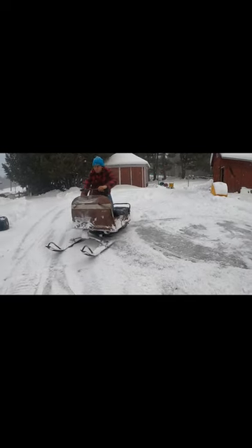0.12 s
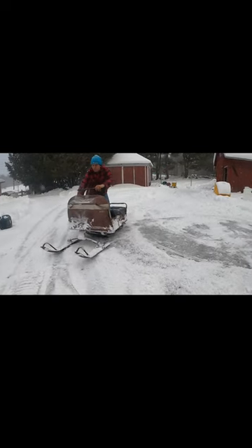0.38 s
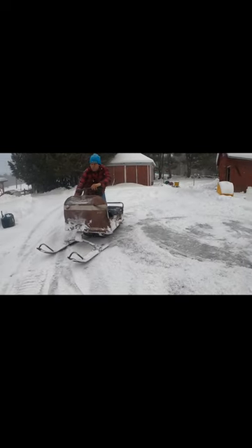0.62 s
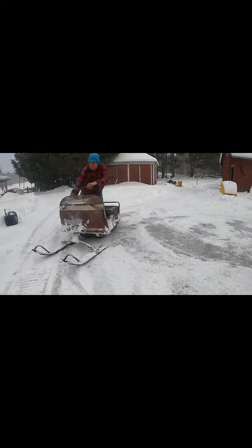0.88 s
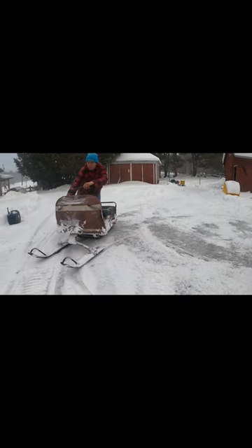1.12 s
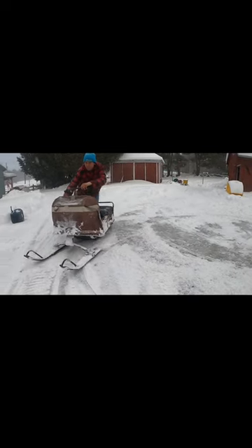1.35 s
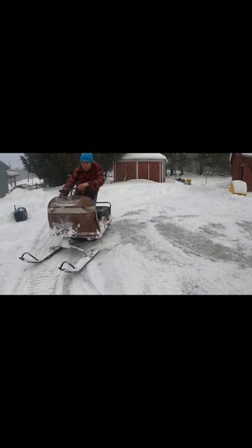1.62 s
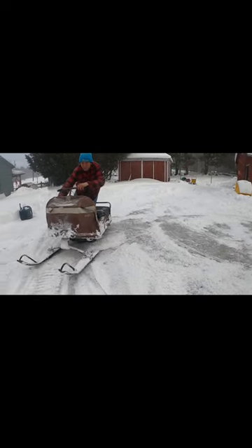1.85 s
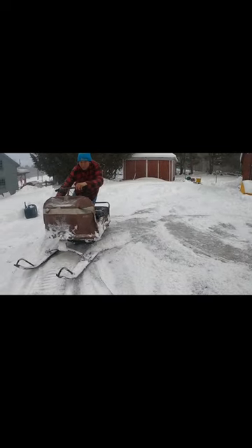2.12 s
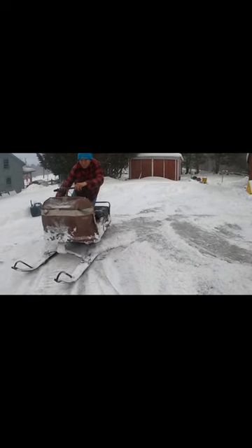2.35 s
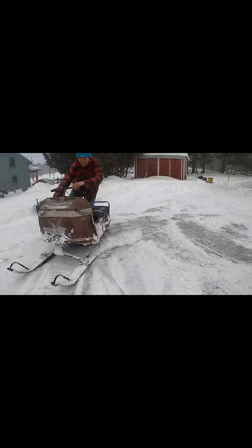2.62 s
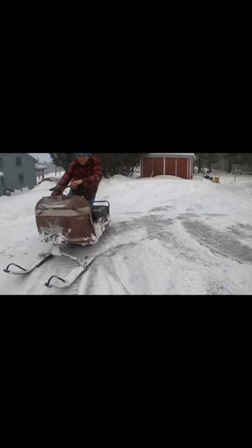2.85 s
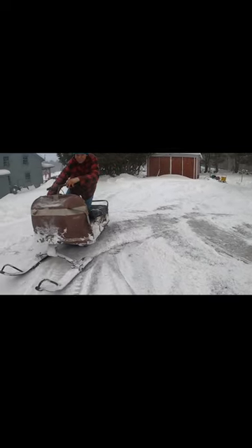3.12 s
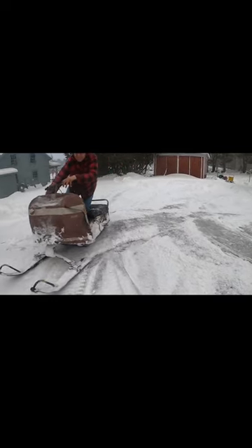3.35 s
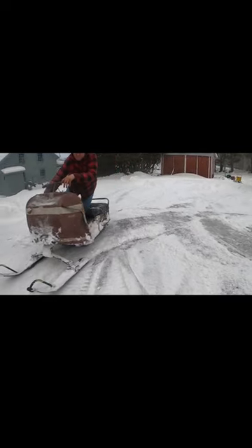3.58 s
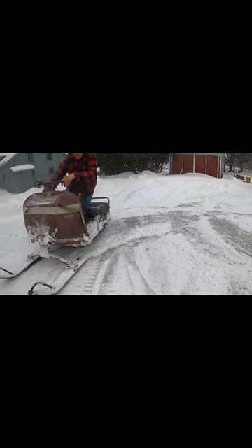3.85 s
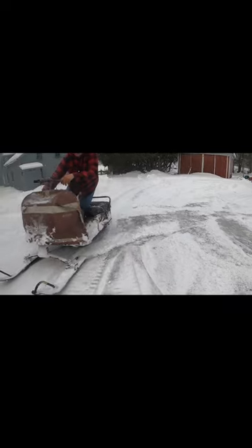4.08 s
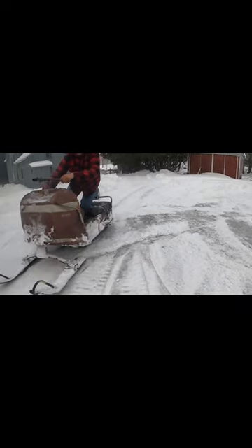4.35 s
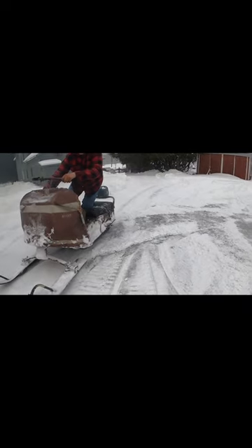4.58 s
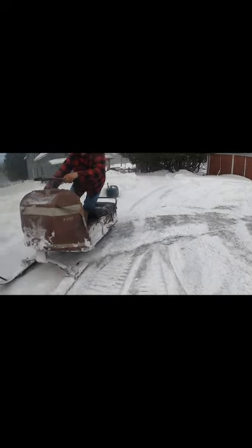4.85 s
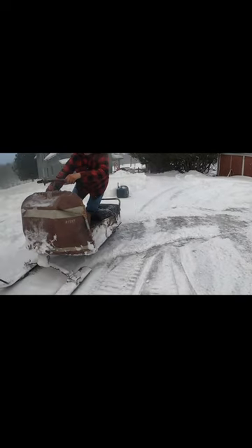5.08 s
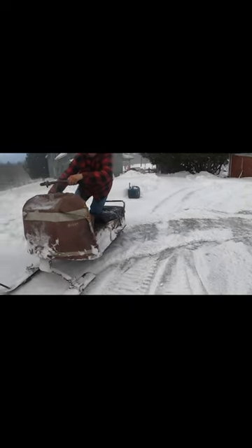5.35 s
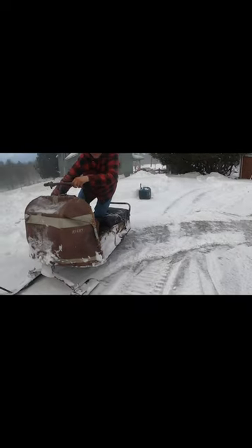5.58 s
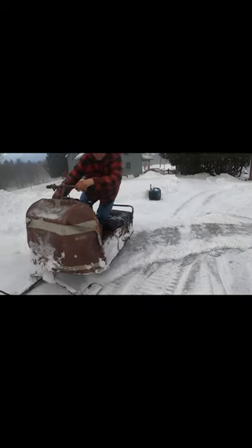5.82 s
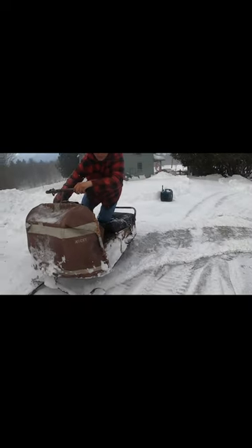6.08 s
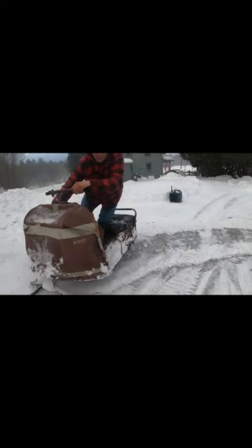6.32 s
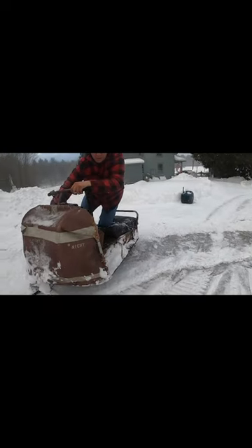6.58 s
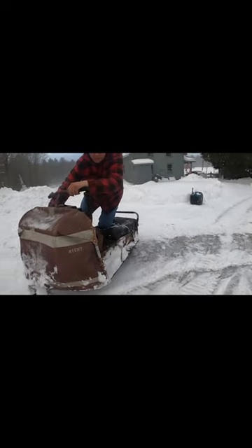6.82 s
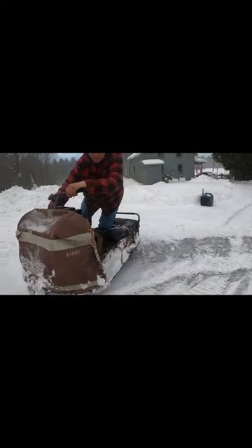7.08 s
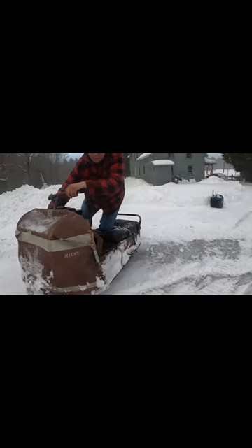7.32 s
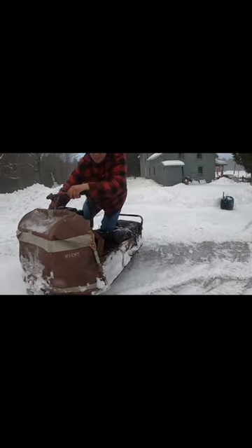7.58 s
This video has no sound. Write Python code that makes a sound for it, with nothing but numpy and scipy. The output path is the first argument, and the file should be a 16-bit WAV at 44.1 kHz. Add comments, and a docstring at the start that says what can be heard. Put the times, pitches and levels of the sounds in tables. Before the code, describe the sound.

Slow-motion single-cylinder engine, close stereo microphones outdoors, dry. First come loose, hesitant low thumps and ticking parts over a rumbling drone, then one hard bark just before two seconds. From there each firing is a deep thud with a rasping gas burst and a short hollow muffler note, quickening slightly into a regular pulse with hood resonance and rattling, continuing to the end.

```python
"""A single-cylinder snowmobile engine idles unevenly on a snowy yard, heard close by as if slowed four-fold.
Each firing is a deep thump, a short swing of pressure that leaves the exhaust pipe ringing.
Bursts of shaped noise make the rasping bark of gas on top, and a fading tone is the muffler's note.
Noise and short damped tones make the rumble, drone, clatter and taps between; panels of the hood ring at times.
The sound falls off steeply above 4 kHz and leaves faint mirror images around 12 kHz."""
import sys
import numpy as np
from scipy import signal
from scipy.fft import rfft, irfft, next_fast_len
from scipy.io import wavfile
from scipy.ndimage import uniform_filter1d, minimum_filter1d, map_coordinates

SR = 44100
rng = np.random.default_rng(int(sys.argv[2]) if len(sys.argv) > 2 else 0)


def volts(x):
    """Linear amplitude factor 10**(x/20) for a level x in dB, scalar or array-like."""
    e = np.asarray(x, float) / 20
    return 10 ** e


def store_pcm(level_fs):
    """Save levels as 16-bit WAV."""
    pcm = np.round(np.clip(level_fs, -1, 1) * 32767).astype(np.int16)
    wavfile.write(sys.argv[1], SR, np.atleast_2d(pcm).T)


N = 339128  # samples in the scene


def unit(x):
    """Scales a sound to rms 1."""
    return x / np.sqrt(np.mean(x ** 2) + 1e-20)


def even(x, span):
    """Holds the rms near 1 over any span of seconds."""
    power = np.abs(uniform_filter1d(x ** 2, round(span * SR)))
    return x / np.sqrt(power + 1e-9)


def along(points, hz):
    """Reads a curve of (f/Hz, value) points on a log frequency axis."""
    f, v = np.transpose(points)
    return np.interp(np.log(hz + 1), np.log(f + 1), v)


def coloured(x, spectrum):
    """Filters a sound with a (f/Hz, level/dB) spectrum."""
    m = next_fast_len(N + SR // 2)
    gain = volts(along(spectrum, np.fft.rfftfreq(m, 1 / SR)))
    return irfft(rfft(x, m) * gain, m)[..., :N]


def field(shape, bins, frames):
    """Smooth random values of rms 1 over frequency and time."""
    over_frequency = uniform_filter1d(rng.standard_normal(shape), bins, 0)
    return unit(uniform_filter1d(over_frequency, frames, 1))


def wobble(rate):
    """A smooth random curve with rate random points a second."""
    points = rng.standard_normal(int(N * rate / SR) + 4)
    return map_coordinates(points, [np.arange(N) * rate / SR])


def rush(spectrum, patchy_db, ragged_db=0.0, rate=150):
    """Noise of rms 1 with patches of random gain, broken into knocks by a fast flutter."""
    noise = rng.standard_normal(N) * volts(ragged_db * wobble(rate))
    z = signal.stft(noise, nperseg=512)[2]
    patches = volts(patchy_db * field(z.shape, bins=3, frames=7))
    patchy = signal.istft(z * patches, nperseg=512)[1][:N]
    return unit(coloured(patchy, spectrum))


def add(track, s, sound):
    """Lays a sound into the track at s seconds."""
    track[round(s * SR):][:len(sound)] += sound


# slow state of the engine before trims and wobbles: t/s, drone level/dB, clatter level/dB,
# pipe ring level/dB, hiss level relative to the bark/dB, rumble level/dB
ENGINE_STATE = [(0.0, -25.5, -33.5, -28, -23, -23), (0.4, -30, -38, -17, -13.5, -24),
                (1.0, -29.5, -40.5, -19, -21.5, -25), (1.452, -28, -38, -19.5, -14, -18.5),
                (1.749, -35, -40, -11, -16, -25), (2.05, -34, -40, -15, -14, -22.5),
                (2.2, -29, -37, -25, -8.5, -28.5), (2.38, -48.5, -51.5, -29.5, -10, -29),
                (2.7, -37, -43, -23.5, -9, -26.5), (3.129, -38.5, -46, -22.5, -11, -27.5),
                (3.6, -27.5, -38, -19, -11.5, -22.5), (3.85, -37.5, -46.5, -28.5, -9.5, -29.5),
                (4.05, -45.5, -46.5, -33, -5.5, -26.5), (4.399, -34.5, -41.5, -15, -11, -28),
                (4.9, -32, -37, -13.5, -8, -25.5), (5.148, -31.5, -36, -25, -10.5, -23),
                (5.501, -30, -36, -9, -16.5, -21), (6.0, -32, -34.5, -13, -9, -22.5),
                (6.45, -32.5, -38, -12.5, -15.5, -21), (6.8, -31.5, -36, -20.5, -14, -20),
                (7.301, -28, -32, -12, -10, -22), (7.69, -37.5, -42, -20.5, -18, -22.5)]


def state(s):
    """Drone, clatter, pipe ring, hiss and rumble levels in dB at s seconds."""
    when, *levels = np.transpose(ENGINE_STATE)
    return [np.interp(s, when, db) for db in levels]


# noise colours of the pumped air and the crankcase: f/Hz, relative level/dB
RUMBLE_SPECTRUM = [(4, -11.5), (12, 2.5), (25, -1.5), (55, 2), (80, 0), (110, -15.5), (160, -42),
                   (300, -120)]
DRONE_SPECTRUM = [(50, -53.5), (100, 1.5), (183, -3.5), (276, -5.5), (422, -10.5), (600, -23), (1500, -120)]


def rumble_and_drone():
    """Pumping air rumbles and the crankcase drones: two bands of low noise with unsteady levels."""
    drone_db, *_, rumble_db = state(np.arange(N) / SR)
    rumble = even(rush(RUMBLE_SPECTRUM, patchy_db=0), span=0.51)
    drone = rush(DRONE_SPECTRUM, patchy_db=2.5)
    return volts(rumble_db + 1.6 * wobble(6)) * rumble + volts(drone_db) * drone


def loose_parts(count):
    """Loose parts tap the frame: short damped tones at scattered times, together of rms 1."""
    when, pitch, size = rng.random((count, 3)).T
    t = np.arange(SR // 30) / SR
    hz = 1100 * 2.3 ** pitch[:, None]
    strength = size[:, None] ** -.4 * 1100 / hz  # a few hard taps, many soft ones; high ones weaker
    knocks = strength * np.sin(2 * np.pi * hz * t) * volts(-60 * t / .035) * (1 - np.exp(-t / 0.0011))
    where = (when * N).astype(int)[:, None] + np.arange(len(t))
    return unit(np.bincount(where.ravel(), np.clip(knocks, -2.2, 2.2).ravel(), N + SR)[:N])


# cooling fins that sing: f/Hz, width/Hz, relative level/dB
FIN_MODES = [(1155, 50, 0.5), (1465, 62, -7.5), (1985, 62, -9), (3034, 75, -21)]


def fins():
    """Narrow metal resonances that come and go, each a thin band of noise."""
    song = np.zeros(N)
    for hz, width, db in FIN_MODES:
        band = [(hz - 3 * width, -50), (hz - width / 2, -3), (hz, 0), (hz + width / 2, -3), (hz + 3 * width, -50)]
        song += rush(band, patchy_db=4) * volts(db + 4.0 * wobble(11))
    return song


# noise colour of clutch and chassis: f/Hz, relative level/dB
CLATTER_SPECTRUM = [(250, -67), (500, 2), (840, -1), (1150, 1), (1590, -6), (2200, -12.5), (3060, -19.5),
                    (4180, -51), (5000, -71), (6500, -120)]


def rattle():
    """Clutch and chassis clatter as knocking noise and small taps; the fins sing along."""
    usual_clatter_db, fin_usual_db, fin_follows = -39, -48.5, 0.58  # fins follow part of the clatter's dB
    clatter_db = state(np.arange(N) / SR)[1]
    fin_db = fin_usual_db + fin_follows * (clatter_db - usual_clatter_db)
    clatter = even(rush(CLATTER_SPECTRUM, patchy_db=0.0, ragged_db=2.5, rate=95), span=.09)
    clatter = clatter + volts(-10) * loose_parts(count=500)
    return volts(clatter_db - 2.0 + 2.4 * wobble(14)) * clatter + volts(fin_db) * fins()


# noise colours of a bark's low part, rasp and hiss, and of the puff with each firing: f/Hz, relative level/dB
THROAT_SPECTRUM = [(80, -60), (200, -5.5), (270, 3.5), (430, 3), (600, -6.5), (900, -44), (2000, -120)]
RASP_SPECTRUM = [(250, -56.5), (600, -0.5), (950, -1), (1400, -4.5), (1900, -11.5), (3000, -55),
                 (5000, -120)]
HISS_SPECTRUM = [(800, -57.5), (1500, -4.5), (1900, -4.5), (2500, -14.5), (3100, -19), (4300, -41.5),
                 (4700, -42), (6500, -55), (9000, -120)]
PUFF_SPECTRUM = [(20, -29.5), (50, -6.5), (90, 7.5), (150, -7), (220, -16.5), (400, -48.5), (800, -120)]
# low part of a usual bark, before trims: t/s, level/dB
THROAT_COURSE = [(0.0, -13.5), (0.9, -13.5), (1.6, -16), (2.8, -18.5), (3.6, -16.5), (4.4, -19), (5.4, -17),
                 (6.3, -17), (7.2, -15.5), (7.69, -19.5)]
# firings: bark onset t/s, bark level before trims/dB, muffler note f/Hz,
# time of the thump ahead of the onset/ms, thump level/dB, thump f/Hz
ENGINE_FIRINGS = [(0.044, -22, 400, -19, -7.5, 39.4), (0.23, -16.5, 514, 10, -11, 26.4),
                  (0.402, -32.5, 288, 34.5, -14.5, 40), (0.569, -29.5, 365, 31, -9.5, 42.1),
                  (0.73, -21, 275, 7, -12, 43.6), (0.911, -15.5, 372, 10.5, -11, 25.54),
                  (1.092, -28, 288, 35.5, -18, 32.9), (1.269, -14.5, 290, 10.5, -11, 24.1),
                  (1.458, -21, 272, -1, -7, 41.7), (1.653, -22, 280.5, 9, -9, 42.5),
                  (1.813, -5, 642, 1.7, -10, 30.9), (2.047, -16, 628, 17.5, -13.5, 53.1),
                  (2.197, -5.5, 298, -1, -8.5, 32.4), (2.374, -6, 289.4, 2.5, -8, 32.6),
                  (2.543, -7, 709, 1.3, -8.5, 32.95), (2.703, -8.5, 422.4, 0, -10, 34.5),
                  (2.856, -8.5, 652, 3, -8.5, 34.9), (3.005, -9.5, 276, 5, -8, 34.1),
                  (3.177, -19, 236.5, 10.5, -11, 29.96), (3.324, -13.5, 219, 9, -10, 30.4),
                  (3.476, -12, 369, 9.5, -10.5, 28.8), (3.606, -10.5, 396, 2.4, -12, 38),
                  (3.76, -3.5, 336, 2, -10, 34.4), (3.91, -8.5, 378, 1, -7.5, 33.7),
                  (4.059, -9.5, 407.6, 5, -10, 32.2), (4.199, -8.5, 235.4, 2, -10, 32.9),
                  (4.338, -11.5, 345, -2, -9.3, 38.7), (4.477, -9.5, 409, 4, -10, 36.15),
                  (4.615, -10, 276, 3, -9.5, 37.4), (4.751, -13, 225.6, 3, -10, 34.24),
                  (4.889, -12, 265, -0.9, -9.5, 36.65), (5.051, -14, 252, 9.5, -11.5, 33.1),
                  (5.188, -11.5, 435, 9.5, -10.5, 31.1), (5.307, -12, 251.6, 1.5, -9, 38.2),
                  (5.451, -11, 263, 0.5, -10, 39.65), (5.595, -11, 264, 2.5, -12, 35),
                  (5.738, -10, 460, -2.5, -11, 40), (5.882, -12.5, 403, -3.7, -10.5, 38.8),
                  (6.028, -10, 224.4, 0.4, -11, 43.8), (6.172, -10, 242, 4, -9, 40.2),
                  (6.315, -10, 416, -3, -11, 43.6), (6.459, -11.5, 668, -0.2, -8, 43.2),
                  (6.598, -11, 248, -2.7, -9.5, 42.8), (6.738, -11, 318.5, 1.3, -10.5, 40.9),
                  (6.884, -10, 231, 2.4, -9, 44.8), (7.026, -9.5, 228, -0.8, -9.5, 48),
                  (7.171, -10.5, 640, 5, -12, 36.65), (7.31, -15, 444, -5, -8.5, 36.2),
                  (7.455, -6.5, 449, 1.5, -9.5, 43.9), (7.599, -8, 393, 1.9, -10.5, 41.4)]


def barks():
    """Turbulent gas bursts from the port: the low part lingers and rings in the muffler, the hiss is short."""
    usual_bark_db, throat_follows = -10, .2  # the low part takes this share of a bark's extra dB
    misfire_db = -20.5  # under this the low part loses a further dB per dB
    usual_flow_s, weak_linger, length_scatter_db = 0.013, .16, 1.28  # linger: dB longer per dB weaker
    muffler_cycles = 37  # swings until a note has fallen by 60 dB
    hiss_scatter_db = 2.7  # brightness differs from firing to firing
    lead_in_db, lead_in_s = -26.5, 0.019  # faint hiss that swells just before each onset and fades after it
    lead = .038  # s that each bark's curves start before its onset
    t = np.arange(SR // 4) / SR - lead
    after = np.clip(t, 0, None)
    gates, muffler = np.zeros((4, N + SR)), np.zeros(N + SR)

    def opening(rise):
        """The port uncovers gradually."""
        return 1 / (1 + np.exp(-(t - rise) / rise))

    rebound = np.exp(-((t - .027) / 0.01) ** 2)  # the returning pressure wave drives a second gust
    lead_in = np.exp(-np.abs(t) / lead_in_s) * (1 - np.exp(-(t + lead) / lead_in_s))
    puff = volts(-19.5) * opening(0.0028) * np.exp(-after / 0.022)  # alike at every firing
    chances = rng.standard_normal((len(ENGINE_FIRINGS), 2))
    for (s, db, muffler_hz, *_), (chance, drawl) in zip(ENGINE_FIRINGS, chances):
        start = s - lead
        strength_db = db - usual_bark_db
        throat_db = np.interp(s, *np.transpose(THROAT_COURSE)) + throat_follows * strength_db
        throat_db += min(db - misfire_db, 0)
        hiss_db = db + state(s)[3] + hiss_scatter_db * chance
        slowness = volts(-weak_linger * strength_db + length_scatter_db * drawl)
        flow = np.exp(-(after / (usual_flow_s * slowness)) ** 1.85)
        throat = opening(0.0013) * (flow + 0.6 * np.exp(-after / 0.024) + 0.28 * rebound)
        rasp = opening(0.0016 * slowness) * (flow + 0.36 * np.exp(-after / 0.019) + 0.075 * rebound)
        hiss = opening(0.0015 * slowness) * (flow + 0.027 * np.exp(-after / 0.011) + 0.055 * rebound)
        add(gates[0], start, volts(throat_db - 4.5) * throat)
        add(gates[1], start, volts(db - 7) * rasp)
        add(gates[2], start, volts(hiss_db) * hiss + volts(hiss_db + lead_in_db) * lead_in)
        add(gates[3], start, puff)
        note = opening(0.0013) * np.sin(2 * np.pi * muffler_hz * t)
        add(muffler, start, volts(throat_db + 0.5 - 60 * after * muffler_hz / muffler_cycles) * note)
    gas = [rush(THROAT_SPECTRUM, patchy_db=4.0),
           rush(RASP_SPECTRUM, patchy_db=2.0, ragged_db=4.5, rate=300),
           rush(HISS_SPECTRUM, patchy_db=1.0, ragged_db=3.0, rate=300),
           rush(PUFF_SPECTRUM, patchy_db=1.5)]
    return np.sum(gates[:, :N] * even(np.array(gas), span=0.02), axis=0) + muffler[:N]


def push(t, hz):
    """About one and a half swings of pressure, then a quick end."""
    return (0.99 + 0.27 * t * hz) * np.sin(2 * np.pi * hz * t) * np.exp(-(t * hz / 1.536) ** 6)


# further low thumps without a bark: t/s, level/dB, f/Hz
EXTRA_THUMPS = [(0.677, -16, 48.1), (0.8485, -10, 49.4), (1.217, -18, 61.4), (1.3, -16.5, 48.8),
                (1.966, -17, 38.3), (3.637, -14.5, 63.9), (5.015, -13, 43), (5.944, -13, 29.2),
                (6.675, -15, 49.9), (6.775, -13, 60.7), (7.058, -12, 54.7), (7.527, -16.5, 50.6)]


def thumps():
    """Each firing pushes the gas column, then the pipe rings on; further low thumps come without a ring."""
    pipe_hz, pipe_scatter = 44, .12  # usual ring and its relative spread from firing to firing
    out, t = np.zeros(N + SR), np.arange(SR // 2) / SR
    chances = rng.standard_normal(len(ENGINE_FIRINGS))
    for (s, *_, lead_ms, push_db, push_hz), chance in zip(ENGINE_FIRINGS, chances):
        later = np.clip(t - 3 / 2 / push_hz, 0, None)  # the ring waits for one and a half swings
        ring_hz = pipe_hz * np.exp(pipe_scatter * chance)
        ring = -np.sin(2 * np.pi * ring_hz * later) * np.exp(-later / 0.072)
        add(out, s - lead_ms / 1000, volts(push_db) * push(t, push_hz) + volts(state(s)[2]) * ring)
    for s, db, hz in EXTRA_THUMPS:
        add(out, s, volts(db) * push(t, hz))
    return out[:N]


# clearest taps of loose parts on the fins: t/s, level/dB
FIN_TAPS = [(0.073, -29), (0.142, -25), (1.3792, -34), (1.7514, -23), (2.1434, -24.5), (5.49, -22.5),
            (6.9691, -30), (7.1028, -26.5)]
# brighter ticks of a small loose part: t/s, level/dB
SMALL_TICKS = [(0.074, -24), (0.115, -27), (0.1994, -28), (0.5144, -28), (0.678, -26), (0.7672, -25),
               (1.125, -25.5), (1.209, -40.5), (1.3175, -32.5), (1.3786, -32.5), (1.491, -28),
               (1.5335, -26.5), (5.5, -28.5), (5.84, -31.5), (5.98, -27), (7.526, -28.5)]
# tones of that small part: f/Hz, relative level/dB
SMALL_PART_MODES = [(1620, -5), (1810, -0.5), (2010, -6)]


def taps():
    """Single louder knocks ring the fins and a small part ticks: sums of damped tones."""
    tick_scatter_db, tick_t60_s = 4, 0.034
    out, t = np.zeros(N + SR), np.arange(SR // 10) / SR
    strike = 1 - np.exp(-t / 0.001)
    ring = sum(volts(db) * np.sin(2 * np.pi * hz * t) for hz, _, db in FIN_MODES)
    for s, db in FIN_TAPS:
        add(out, s, volts(db - 60 * t / 0.06) * strike * ring)
    chances = rng.standard_normal((len(SMALL_TICKS), len(SMALL_PART_MODES)))
    for (s, db), chance in zip(SMALL_TICKS, chances):
        tick = sum(volts(level + tick_scatter_db * c) * np.sin(2 * np.pi * hz * t)
                   for (hz, level), c in zip(SMALL_PART_MODES, chance))
        add(out, s, volts(db - 60 * t / tick_t60_s) * strike * tick)
    return out[:N]


# hood panels that ring on after some firings: t/s, f/Hz, level/dB, time to fall by 60 dB/s
HOOD_PANELS = [(3.181, 234.5, -21, 0.39), (3.344, 406, -23.5, 0.15), (3.49, 398, -16.5, 0.19),
               (3.5, 241, -25, 0.32), (5.06, 258.6, -16.5, 0.25), (5.203, 252, -19.5, .3),
               (5.458, 273, -12, 0.12), (5.6, 275, -11.5, 0.12), (6.33, 307, -15, 0.17)]


def panels():
    """Thin sheet metal rings at one low mode, swelling quickly and dying away."""
    out, t = np.zeros(N + SR), np.arange(SR // 2) / SR
    for s, hz, db, t60 in HOOD_PANELS:
        swell = 1 - np.exp(-t / 0.0086)
        add(out, s, volts(db - 60 * t / t60) * swell * np.sin(2 * np.pi * hz * t))
    return out[:N]


# microphone pair, steady part of the balance: f/Hz, left over right level/dB
PAIR_BALANCE = [(60, 1), (150, 0), (350, .5), (700, 2.2), (1400, -.2), (2400, -.6), (5000, -2)]
# microphone pair, strength of the drift: f/Hz, phase/radians
PAIR_WANDER = [(30, .17), (90, .25), (180, .36), (350, .44), (700, .72), (1400, .98), (4000, 1.1)]


def microphones(x):
    """Reflections off hood and snow shift phase and level between two microphones, drifting with time."""
    hz, t, z = signal.stft(x, SR, nperseg=1024)
    wander = along(PAIR_WANDER, hz)[:, None]
    phase = wander * field(z.shape, bins=6, frames=60)
    tilt_db = along(PAIR_BALANCE, hz)[:, None] + 1.5 * wander * field(z.shape, bins=4, frames=12)
    half = volts(tilt_db / 2) * np.exp(.5j * phase)  # each side takes half of the difference
    return signal.istft(np.array([z * half, z / half]), SR, nperseg=1024)[1][:, :N]


def scene():
    """The idling engine in the open, all layers in stereo."""
    return microphones(rumble_and_drone() + rattle() + barks() + thumps() + taps() + panels())


def limited(x, top):
    """Gain ducks just ahead of peaks over top, alike in both channels."""
    need = np.minimum(1, top / (np.abs(x).max(axis=0) + 1e-9))
    return x * uniform_filter1d(minimum_filter1d(need, size=265), size=133)


def top_cut(x):
    """Nothing passes above the cut-off."""
    return signal.sosfilt(signal.butter(12, 15720, fs=SR, output="sos"), x)


# band left in the slowed sound: f/Hz, level/dB
SLOW_BAND = [(1, -45.5), (6, -1), (4250, -0.5), (4600, -14), (7000, -13)]
# leak of the slow-down filter: f/Hz, level/dB
MIRROR_LEAK = [(7600, -66.5), (7800, -10.5), (9000, -18), (10000, -26.5), (11000, -39.5), (11500, -51),
               (11850, -73.5), (11930, -110), (12070, -110), (12150, -73.5), (12500, -55.5), (13000, -43),
               (14000, -30.5), (15000, -27), (15700, -26)]


def record(dry):
    """Limiter and band limit; stretching samples four-fold mirrors the sound around the slow sample rate."""
    slow_rate_hz = 12000
    slow = coloured(limited(dry, top=.92), SLOW_BAND)
    mirror = 2 * slow * np.cos(2 * np.pi * slow_rate_hz * np.arange(N) / SR)
    mix = slow + coloured(mirror, MIRROR_LEAK)
    return top_cut(mix)


dry = scene()
out = record(dry)
store_pcm(out)
```